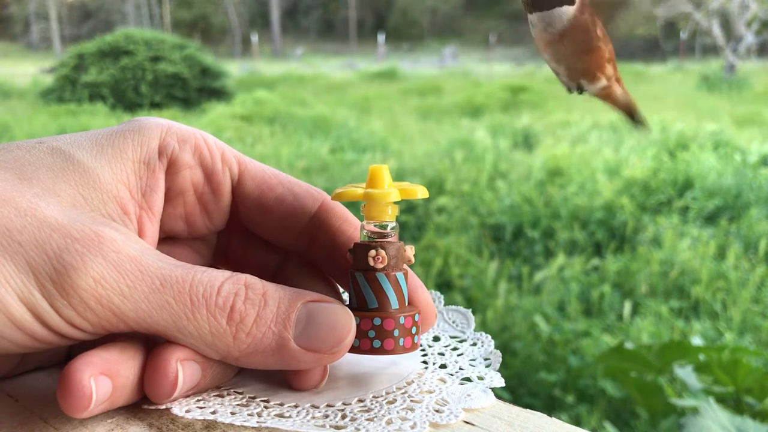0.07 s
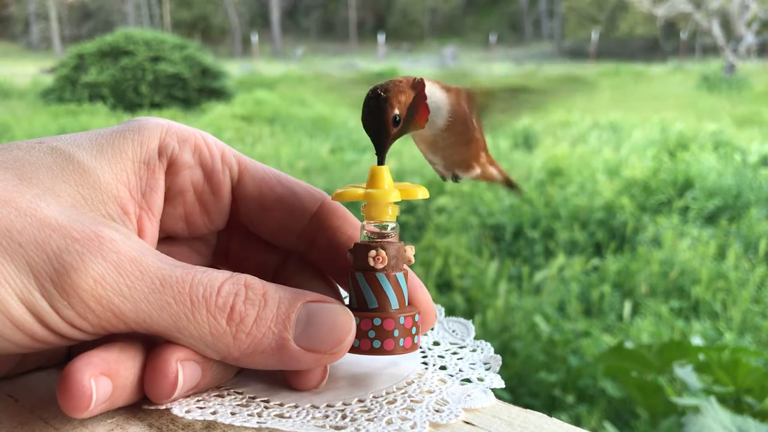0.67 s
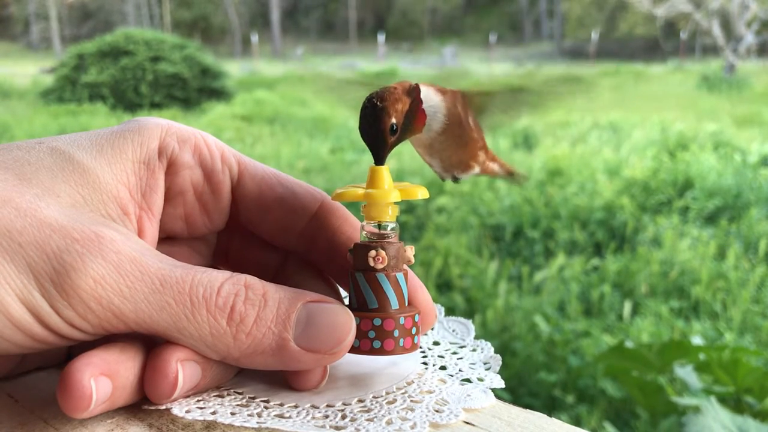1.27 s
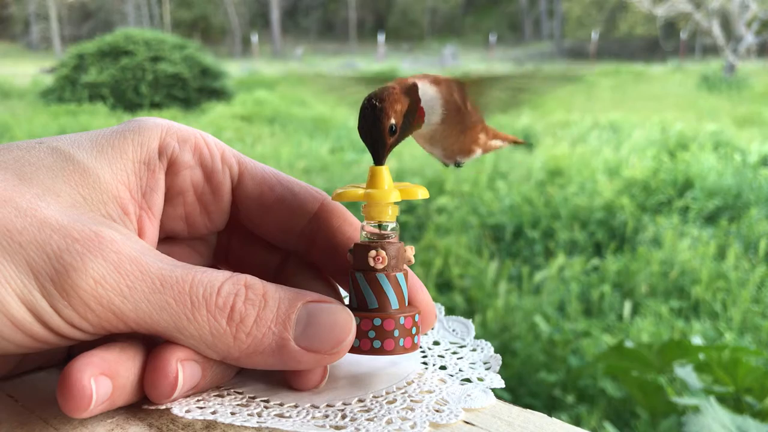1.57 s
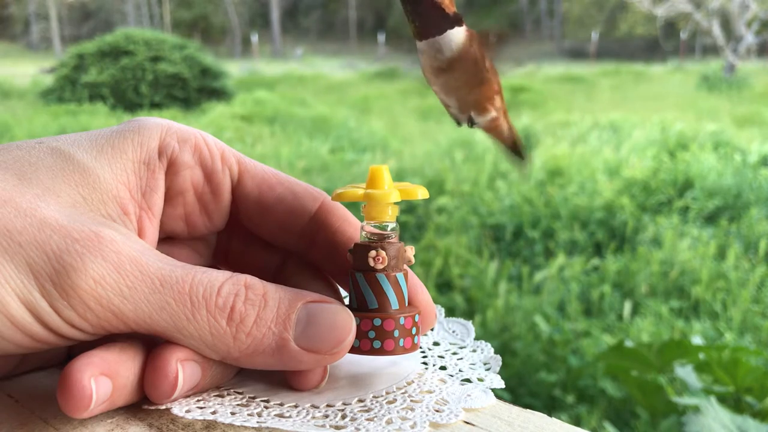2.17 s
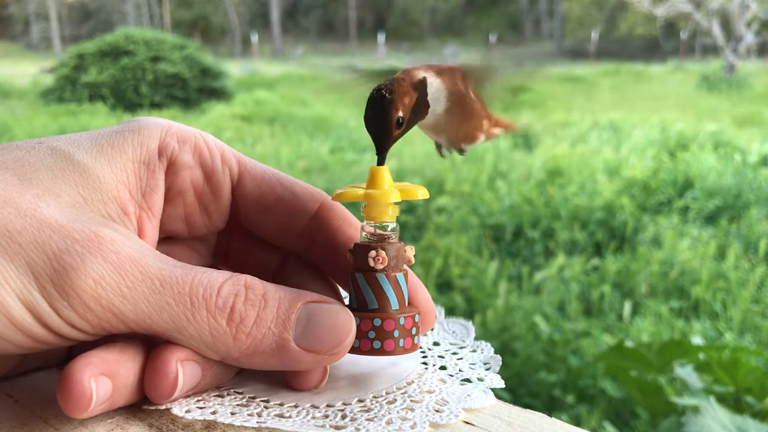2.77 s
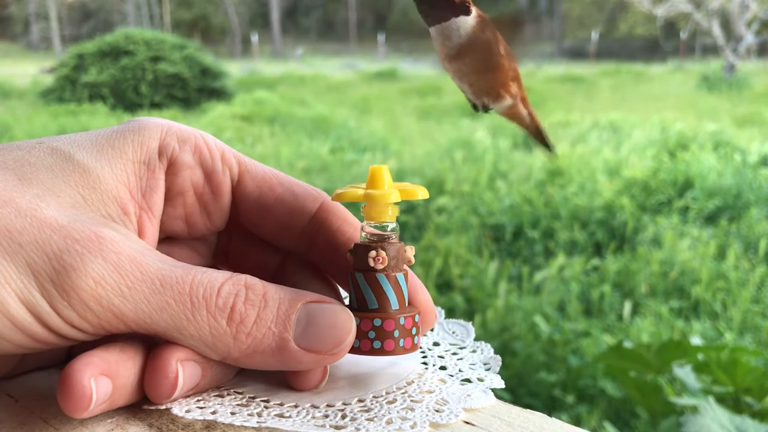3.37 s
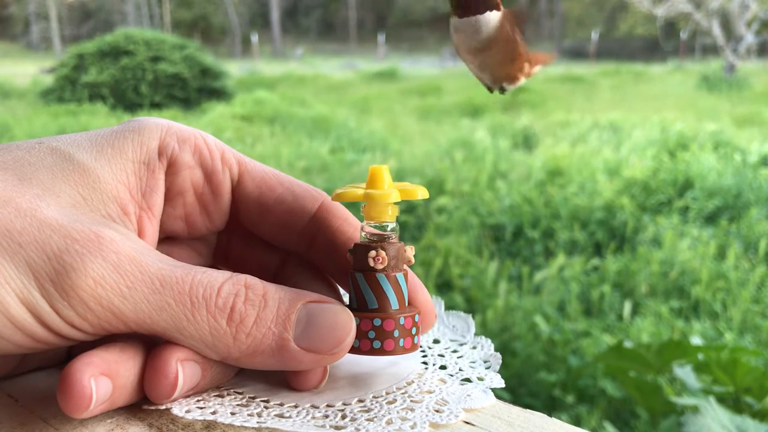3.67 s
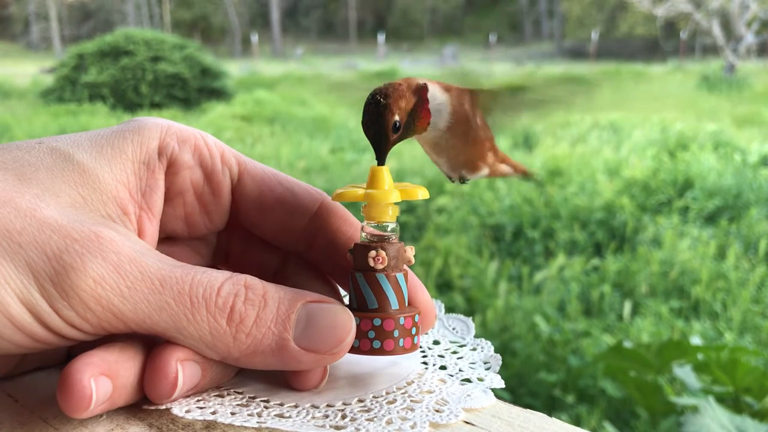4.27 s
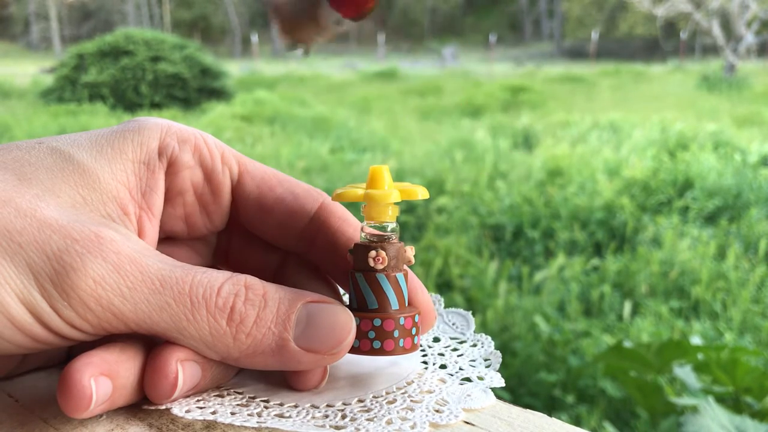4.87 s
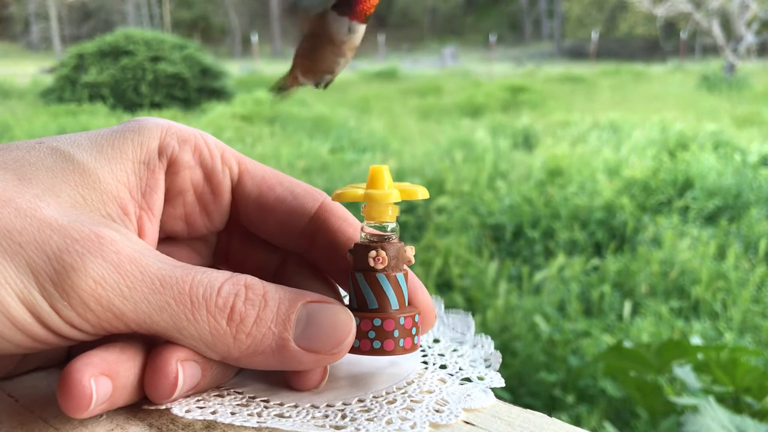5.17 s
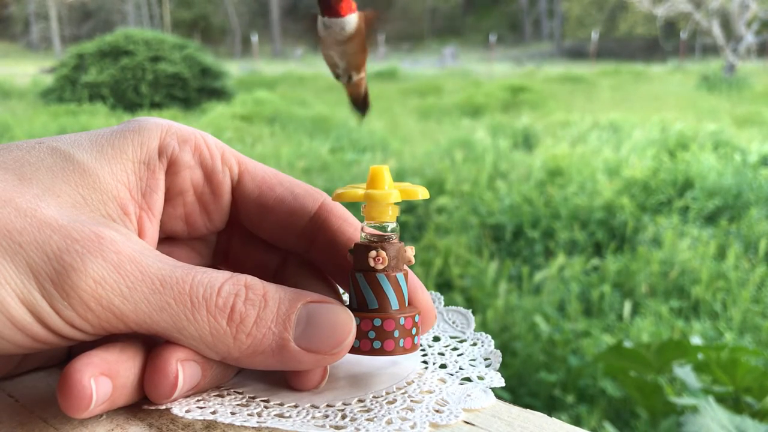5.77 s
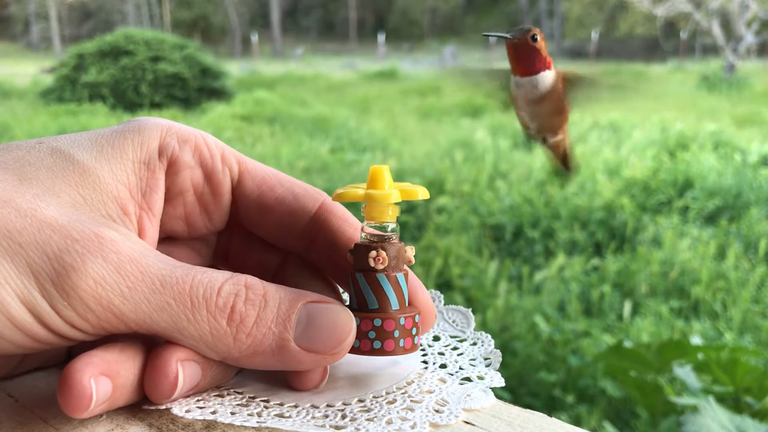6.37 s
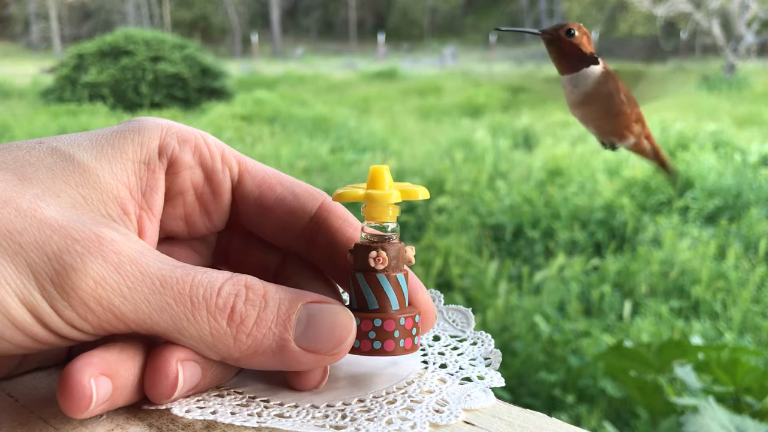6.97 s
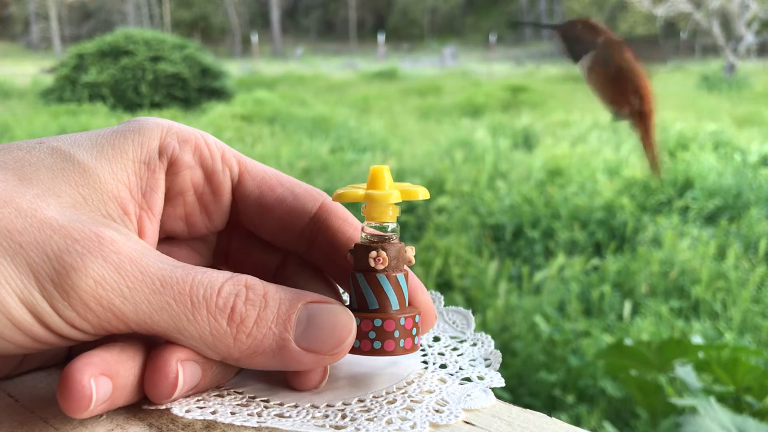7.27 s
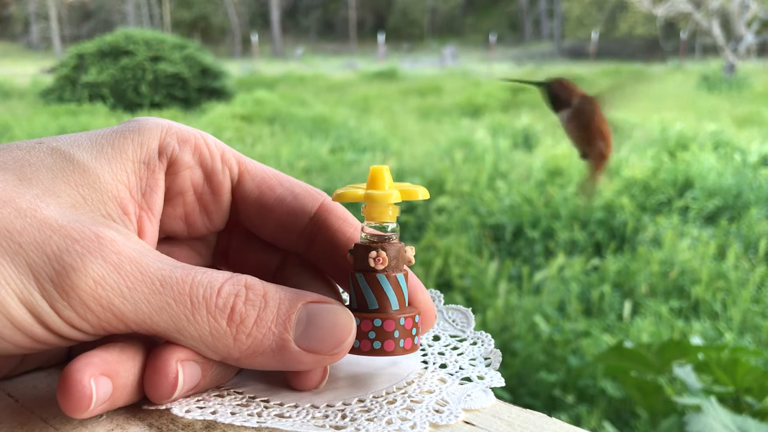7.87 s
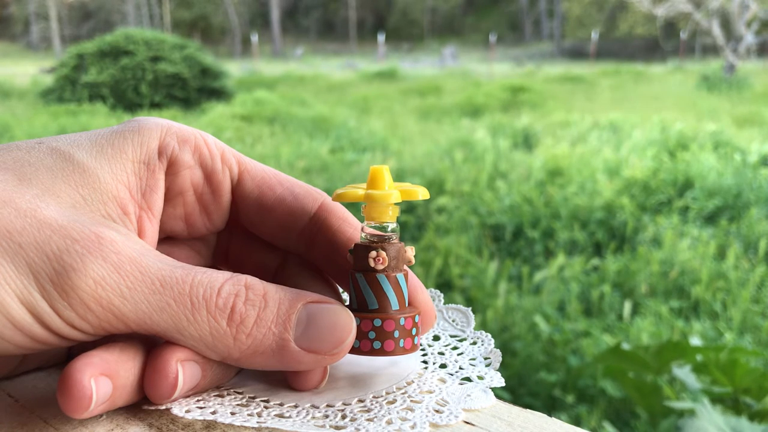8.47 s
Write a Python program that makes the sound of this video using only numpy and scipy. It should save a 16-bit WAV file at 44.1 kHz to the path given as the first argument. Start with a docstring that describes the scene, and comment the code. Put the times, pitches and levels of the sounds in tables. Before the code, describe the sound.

A hummingbird hovers close to the microphone at a garden feeder, its wings making a low, fluttering hum topped by a shrill, pulsing trill. Quick, high chittering opens the scene. The whirr surges as the bird darts about, puffing air onto the microphone, while a second bird trills past. Late on come a sharp chip, more chitter and a brief buzzy call as the wings fade over faint outdoor noise.

```python
"""Hummingbirds at a feeder

A male hovers at a hand-held feeder close to the microphone, darts back and forth and flies off.
Each wingbeat gives a low push of air, a swish through the feathers and a shrill whistle of the
fluttering wing tips. A rival circles with his own wing trill. The birds chip, chitter and buzz in
frequency-modulated tones of the syrinx, and a porch and a house wall reflect the sound."""
import sys
import numpy as np
from scipy import signal
from scipy.fft import rfft, irfft, next_fast_len
from scipy.io import wavfile
from scipy.ndimage import map_coordinates

SR = 44100
rng = np.random.default_rng(int(sys.argv[2]) if len(sys.argv) > 2 else 0)


def int16_out(signal):
    """Quantize to a 16-bit WAV file."""
    q = np.round(np.clip(np.atleast_2d(signal).T, -1, 1) * 32767)
    wavfile.write(sys.argv[1], SR, q.astype(np.int16))


N = 384993
T = np.arange(N) / SR


def amp(db):
    """Amplitude ratio of a level in decibels."""
    return 10 ** (np.asarray(db) / 20)


def unit(x):
    """Normalisation to rms 1."""
    return x / np.sqrt(np.mean(x ** 2) + 1e-20)


def curves(rows, at=T):
    """Linear interpolation of each later column against the first."""
    knots, *columns = np.transpose(rows)
    return [np.interp(at, knots, column) for column in columns]


def wobble(rate):
    """Smooth random modulation, with rate knots a second."""
    return map_coordinates(rng.standard_normal(int(N * rate / SR) + 4), [T * rate])


def coloured(x, spectrum):
    """Zero-phase filtering through points of (f/Hz, gain/dB)."""
    size = next_fast_len(N + SR // 2)
    hz, db = np.transpose(spectrum)
    gain = amp(np.interp(np.log(np.fft.rfftfreq(size, 1 / SR) + 1), np.log(hz), db))
    return irfft(rfft(x, size) * gain, size)[:N]


def noise(spectrum):
    """Filtered Gaussian noise of rms 1."""
    return unit(coloured(rng.standard_normal(N), spectrum))


def add(track, start, sound):
    """Superposition of a sound on the track, from start seconds on."""
    at = round(start * SR) + np.arange(len(sound))
    inside = (at >= 0) & (at < N)
    track[at[inside]] += sound[inside]


def bell(centre, half):
    """Gaussian window whose half-width is its standard deviation."""
    return np.exp(-.5 * ((T - centre) / half) ** 2)


def swells(rows):
    """Amplitude envelope summed from Gaussian windows."""
    return sum(amp(db) * bell(s, half) for s, db, half in rows)


def beats(turns):
    """Times at which the wing phase completes a cycle."""
    return np.interp(np.arange(1, turns[-1]), turns, T)


# Background spectrum: f/Hz, level/dB
GARDEN_SPECTRUM = [(25, -12), (80, -0.5), (115, -4.5), (190, -3.5), (280, -8), (450, -16.5), (750, -31),
                   (1300, -28), (1900, -35), (2500, -36), (3500, -38.5), (4200, -41.5), (6000, -42.5),
                   (16000, -45)]

def garden():
    """Ambient noise, slowly amplitude-modulated by the breeze."""
    breeze_db = .7 * wobble(3)
    return amp(-48.5 + breeze_db) * noise(GARDEN_SPECTRUM)


# Wingbeat rate in steady flight: t/s, f/Hz
BEAT_RATE = [(0.0, 57.03), (0.4, 57.22), (1.0, 57.67), (1.4, 59.4), (2.0, 59.36), (2.4, 57.83),
             (2.9, 61.33), (3.5, 57.45), (4.0, 57.28), (4.55, 59.01), (5.15, 59.7), (5.8, 57.49),
             (6.55, 58.69), (7.35, 58.11), (7.75, 66.06), (8.05, 57.99), (8.4, 60.42), (8.73, 57.67)]
# Bursts of faster, harder strokes: t/s, half-width/s, extra rate/Hz, push gain/dB, whistle gain/dB
DART_BURSTS = [(0.047, 0.018, 0.0, 4, 3.5), (0.592, 0.039, 5.5, 7, 6), (0.746, 0.03, 3.5, 7, 8),
               (0.827, 0.014, 0.69, 6.5, -3), (1.755, 0.031, 5, 7, 13.5), (1.869, 0.0096, 5.0, 0.5, 9.5),
               (2.459, 0.011, 0.75, 3.5, 5), (2.572, 0.023, 2.5, 5.5, 3.0), (2.644, 0.029, 11.0, 3.5, 13),
               (3.035, 0.065, 0.45, 3.5, -1), (3.179, 0.026, 1.7, 8, 12.5), (3.288, 0.018, 0.0, 8.0, 3),
               (3.711, 0.016, 4, 6.5, 12.5), (4.097, 0.012, 2.0, 3.5, 8.8), (4.233, 0.035, 5.5, 7, 9),
               (4.782, 0.046, 6, 7, 12.5), (4.88, 0.016, 5.0, 3.5, 2.5), (5.088, 0.034, 0.22, 3.5, 1),
               (5.663, 0.025, 1.5, 9.5, 12.5), (6.285, 0.041, 2, 9, 17.5), (6.734, 0.026, 3, 4, 8.5),
               (7.322, 0.022, 0.0, 13.5, 19), (7.536, 0.033, 0.0, 6, 7), (8.045, 0.055, 2, 0, 14.5)]
# The wings ease off: t/s, half-width/s, push gain/dB
WING_LULLS = [(0.087, 0.028, -6), (0.668, 0.014, -1), (0.874, 0.028, -6), (1.821, .018, -9),
              (2.535, 0.0096, -12), (2.753, 0.023, -7.5), (3.277, 0.033, -11), (3.773, 0.0068, -5),
              (4.977, 0.016, -16), (7.25, 0.032, -2.5), (7.407, 0.03, -4), (7.88, 0.021, -3.5)]

def flight():
    """Phase is the integral of beat rate. Returns wing phase/cycles, push gain/dB, whistle gain/dB."""
    pace, = curves(BEAT_RATE)
    faster, push_db, whistle_db = sum(np.outer(gains, bell(s, half)) for s, half, *gains in DART_BURSTS)
    lull_db = sum(db * bell(s, half) for s, half, db in WING_LULLS)
    turns = .29 + np.cumsum(pace + faster) / SR
    return turns, push_db + lull_db, whistle_db + 1.44 * lull_db


# Spectrum of air through the feathers: f/Hz, level/dB
SWISH_SPECTRUM = [(200, -49), (500, 5), (900, 12.5), (1300, 3.5), (1850, -1.5), (2400, 5.5), (3400, 1.5),
                  (4200, 3), (5200, 0), (7000, 1), (9500, 3.5), (12000, -3), (16000, 3)]
# Each band's two peaks, timed from the push:
# lowest f/Hz, highest f/Hz, sharp peak/cycles, its sharpness, broad peak/cycles, its relative height
STROKE_BANDS = [(0, 1700, 0.091, 5.4, -0.24, 0.39), (1693, 5000, -0.337, 13, -0.019, 0.4),
                (5100, 11000, -0.098, 13, 0.033, 0.26), (10980, 16000, -0.47, 16, -0.095, 0.64)]

def feather_swish(turns):
    """Flow noise modulated by the stroke: a bright flick as the wing turns over, then lower rushes."""
    def peak(at, sharpness):
        return np.exp(sharpness * (np.cos(2 * np.pi * (turns - at)) - 1))

    air, hz = rfft(noise(SWISH_SPECTRUM)), np.fft.rfftfreq(N, 1 / SR)
    distinct = np.interp(T, [7.3, 8.1], [1, .4])  # the swishes merge as he leaves
    track = np.zeros(N)
    for low, high, sharp_at, sharpness, broad_at, height in STROKE_BANDS:
        band = irfft(air * ((hz >= low) & (hz < high)), N)
        envelope = unit(.32 + peak(sharp_at, sharpness) + height * peak(broad_at, 2.1))
        track += band * envelope ** distinct
    return track


# Hum of forward flight, at twice the beat rate: t/s, level/dB
FORWARD_LEVEL = [(0, -62), (4.95, -76), (5.3, -56.5), (6.9, -59.5), (7.88, -54), (8.04, -39.5), (8.25, -56),
                 (8.73, -60)]
# Its partials: multiple of the beat rate, relative level/dB
FORWARD_PARTIALS = [(2, 0), (4, -7), (8, -22), (10, -19)]

def forward_hum(turns):
    """Symmetry: in forward flight both half strokes sound alike, giving even harmonics only."""
    level_db, = curves(FORWARD_LEVEL)
    partials = sum(amp(db) * np.sqrt(2) * np.cos(2 * np.pi * k * turns) for k, db in FORWARD_PARTIALS)
    return amp(level_db + wobble(6.3)) * partials


# Steady flight as he nears and turns: t/s, push level/dB, whistle level/dB
FLIGHT_LEVELS = [(0.0, -41, -44), (0.5, -43, -40), (0.95, -41, -55.5), (1.2, -37, -46.5),
                 (1.65, -36.5, -46), (2.1, -41.5, -43.5), (2.5, -41, -48.5), (2.9, -38.5, -41),
                 (3.45, -42.5, -44.5), (4.0, -41.5, -43.5), (4.6, -37, -44.5), (5.2, -43.5, -47),
                 (5.9, -47, -47.1), (6.5, -45, -46.5), (7.2, -46, -44.5), (7.7, -50.5, -51.5),
                 (8.25, -49.5, -46), (8.73, -54.5, -78)]
# Base levels of the moving air: t/s, hum level/dB, swish level/dB
AIR_LEVELS = [(0, -45.5, -55), (.3, -43, -57.5), (1.7, -42.5, -56.5), (2.2, -45, -55), (2.7, -41, -54.5),
              (3.5, -51, -55), (4.3, -43, -57), (5, -44, -54.5), (6, -45, -56.5), (7.2, -49, -54),
              (7.6, -54, -53), (8.3, -74, -49.5), (8.73, -65, -63)]
# Spectrum of one push of air: f/Hz, level/dB
PUSH_SPECTRUM = [(40, -42), (70, -8), (120, -1.5), (180, 1.5), (240, -0.5), (300, -3), (420, -13),
                 (600, -17.5), (760, -29), (1200, -41), (2500, -56.5)]
HUM_GROWTH, SWISH_GROWTH = .72, .58  # dB for each dB that the push gains

def wing_air(turns, effort_db):
    """Aerodynamic loading: periodic lift hums at the beat rate; each beat adds a push and a swish."""
    push_db = curves(FLIGHT_LEVELS)[0] + effort_db
    hum_db, swish_db = curves(AIR_LEVELS)
    impulses = np.zeros(N)
    for s in beats(turns):
        add(impulses, s, amp(rng.normal(0, 1.8, 1)))
    pulses = unit(coloured(impulses, PUSH_SPECTRUM))
    hardness = np.clip(.055 * effort_db, 0, 1)  # hard strokes are brighter
    crack = hardness * coloured(pulses, [(250, -49), (500, 3.5), (1200, 7)])
    near = np.interp(T, [4.8, 5.1, 7.4, 8], [.9, .65, .59, .39])  # farther off, eddies blur the beats
    eddies = noise([(40, -22), (80, -12), (110, 1.5), (250, -3.5), (400, -10.5), (700, -19.5),
                    (1500, -68)])
    push = amp(push_db) * (near * (pulses + crack) * amp(-.37) + (1.15 - near) * amp(1) * eddies)
    hum_gain = amp(hum_db + HUM_GROWTH * effort_db + .8 * wobble(11))
    hum = hum_gain * np.sqrt(2) * np.cos(2 * np.pi * (turns + .28))
    swish_gain = amp(swish_db + 2 + SWISH_GROWTH * (push_db + 38.5))
    return push + hum + forward_hum(turns) + swish_gain * feather_swish(turns)


def tip_whistles(times, db, hz, half, glide_hz, scatter_db, scatter_hz, rough):
    """Aeroelastic flutter: each wing tip sounds a brief gliding tone, the two never quite alike."""
    track, t = np.zeros(N), np.arange(-SR // 100, SR // 100) / SR
    smoothing = np.hanning(SR // 800)[None]
    for wing_db in (0, -8):
        size, tune, lag, length = rng.standard_normal((len(times), 4)).T[:, :, None]
        u = t / (np.reshape(half, (-1, 1)) * np.exp(.28 * length)) - .59 * lag  # time in half-widths
        waver = unit(signal.fftconvolve(rng.standard_normal(u.shape), smoothing, "same", axes=1))
        pitch = hz[:, None] * (1 + rough * waver) + scatter_hz * tune + glide_hz * np.tanh(u / 2)
        phase = 2 * np.pi * np.cumsum(pitch, 1) / SR
        envelope = amp(db[:, None] + wing_db + scatter_db * np.tanh(size)) * np.exp(-u ** 2)
        for s, burst in zip(times, envelope * np.sin(phase)):
            add(track, s + t[0], burst)
    return track


# The whistle lengthens as he flies off: t/s, half-width/s
WHISTLE_WIDTH = [(0, 0.00077), (7.35, 0.00076), (8, 0.0014), (8.7, 0.0021)]
WHISTLE_HZ, WHISTLE_HZ_PER_DB = 9298, 28.5  # pitch in steady flight, and its rise with effort
FLICKER_DB = 6  # the flutter catches better on some beats than on others

def wing_trill(turns, effort_db):
    """Flutter twice a cycle, sharp and then softer; harder strokes whistle higher and more surely."""
    times = beats(turns)
    effort_db = np.interp(times, T, effort_db)
    half, = curves(WHISTLE_WIDTH, times)
    unsteadiness = np.exp(-np.maximum(effort_db, 0) / 7)
    drive_db = effort_db + FLICKER_DB * np.tanh(rng.standard_normal(len(times))) * unsteadiness
    duty_db = 10 * np.log10(half * 60)  # a longer whistle spreads the same energy
    db = curves(FLIGHT_LEVELS, times)[1] + drive_db - duty_db
    hz = WHISTLE_HZ + WHISTLE_HZ_PER_DB * drive_db
    down = tip_whistles(times - .0027, db - .3, hz, half,
                        glide_hz=-550, scatter_db=3, scatter_hz=174.6, rough=.0287)
    back = tip_whistles(times + .0034, .5 * db - 35.5, hz - 400, half=.0041,
                        glide_hz=196, scatter_db=2.5, scatter_hz=207.3, rough=.044)
    hiss = noise([(1500, -18), (4000, -30), (7000, -2.5), (11000, 2), (16000, -11)])
    rasp = amp(-23) * np.abs(signal.hilbert(down)) * hiss
    return down + back + rasp


# The rival flies past: t/s, level/dB, half-width/s, f/Hz
RIVAL_PASSES = [(.12, -50, 0.27, 9200), (.44, -30.5, 0.016, 9100), (2.92, -38, 0.058, 9050),
                (4.4, -46.5, 0.081, 9000), (5.7, -42, 0.082, 9100), (6.55, -46, .18, 9050),
                (7.55, -42, 0.1, 9300), (7.8, -46, 0.16, 8800), (8.27, -52, 0.076, 8700),
                (8.51, -44.5, 0.034, 8550), (8.68, -62.5, .04, 8350)]

def rival_trill():
    """Wing-tip flutter at an independent beat rate, swelling and fading with each pass."""
    beat_hz = 63 + 1.5 * wobble(3.5)
    times = beats(np.cumsum(beat_hz) / SR)
    envelope = swells([row[:3] for row in RIVAL_PASSES])
    db = 20 * np.log10(np.interp(times, T, envelope) + 1e-6)
    hz = curves(RIVAL_PASSES, times)[-1]
    return tip_whistles(times, db + 3.5, hz, half=.0014,
                        glide_hz=402, scatter_db=12.5, scatter_hz=123, rough=.019)


def syrinx(hz, db, overtone_db, lowest_hz=1000):
    """Source and filter: six harmonics, overtone_db apart in level, band-passed by the beak."""
    k = np.arange(1, 7)[:, None]
    beak = np.clip((15500 - k * hz) / 2000, 0, 1) * np.minimum(k * hz / lowest_hz, 1) ** 4
    phase = 2 * np.pi * np.cumsum(hz) / SR
    return np.sqrt(2) * amp(db) * np.sum(amp(overtone_db * (k - 1)) * beak * np.sin(k * phase), 0)


# Scolding notes: t/s, level/dB, kind (1 a clear dipping whistle, 0 a rasp)
CHITTER_NOTES = [(0.039, -37, 0), (0.104, -39, 1), (0.132, -34, 0), (0.211, -32, 0), (0.271, -34, 1),
                 (0.3, -34.5, 0), (0.379, -30.5, 0), (.4375, -27.5, 1), (.464, -45, 0), (0.53, -30.5, 0),
                 (0.592, -31.5, 1), (0.619, -38, 0), (0.685, -35, 1), (.713, -32.5, 0), (0.784, -25, 1),
                 (0.8831, -26, 1), (0.9982, -24.5, 1), (1.1065, -26, 1), (1.222, -26, 1), (7.135, -38.5, 0),
                 (7.212, -40, 0), (7.306, -40, 0), (7.405, -40, 0), (7.491, -40, 0), (7.581, -37, 0),
                 (7.647, -47, 0), (7.68, -39, 0), (7.741, -41, 0), (7.774, -37.5, 0), (7.859, -35, 0),
                 (7.936, -32.5, 0)]
# Contours of the two kinds: t/s from the note's centre, nominal f/Hz, relative level/dB
DIP_CONTOUR = [(-.014, 8350, -20), (-.006, 9900, -29), (-.004, 9400, -13), (-.002, 6800, -14),
               (0, 5850, -3), (.002, 6440, -11), (.004, 7400, -10), (.006, 5670, -10), (.009, 4370, -31),
               (.012, 4050, -30)]
RASP_CONTOUR = [(-.014, 8800, -17), (-.004, 8050, -9.5), (-.001, 7100, -6.5), (.002, 6170, -10),
                (.005, 5260, -21), (.008, 4700, -24)]

def chitter():
    """Frequency modulation: shallow flutter leaves a whistle clear, deep flutter makes a rasp."""
    track = np.zeros(N)
    loudest_db = max(level for _, level, _ in CHITTER_NOTES)
    for s, level, clear in CHITTER_NOTES:
        contour, depth_hz, overtone_db = (DIP_CONTOUR, 160, -11) if clear else (RASP_CONTOUR, 1100, -8.5)
        t = np.arange(contour[0][0], contour[-1][0], 1 / SR)
        hz, db = curves(contour, t)
        rise = clear * .016 * min(loudest_db - level, 10)  # softer whistles sit higher
        hz = hz * (rng.normal(.96, .0175) + rise)
        flutter = np.sin(2 * np.pi * (rng.normal(410, 64.5) * t + rng.random()))
        add(track, s + t[0], syrinx(hz + depth_hz * flutter, db + level + 1, overtone_db))
    return track


# Falling chips: t/s, level/dB, length/s, lower cutoff of the beak/Hz
CHIP_NOTES = [(.063, -48, .024, 3000), (3.409, -50, .02, 4500), (3.858, -50, .025, 4200),
              (4.05, -49, .02, 4500), (4.095, -52, .016, 2200), (4.509, -46, .018, 4500),
              (4.988, -56, .022, 4500), (5.568, -48, .025, 3600), (5.62, -48, .02, 4800),
              (6.1952, -26, .0135, 2300), (6.554, -46, .018, 4800), (7.586, -47, .019, 2800),
              (7.778, -48, .021, 3200), (8.0412, -32, .0145, 3700)]
# Contour of a chip: share of its length, f/Hz, relative level/dB, step between harmonics/dB
CHIP_CONTOUR = [(-.06, 9300, -30, -35), (.04, 8700, 0, -32), (.22, 6400, 0, -17), (.36, 3700, -2, -7),
                (.48, 2650, -4, -5.5), (.68, 2250, -5, -5.5), (.88, 2050, -6, -6), (1.1, 1300, -26, -7)]

def chips(loud):
    """Frequency sweeps, the loud or the soft ones: each plunges over two octaves and turns harsh."""
    track = np.zeros(N)
    for s, level, length, lowest_hz in CHIP_NOTES:
        if (level > -35) == loud:
            progress = np.arange(CHIP_CONTOUR[0][0], CHIP_CONTOUR[-1][0], 1 / (length * SR))
            hz, db, overtone_db = curves(CHIP_CONTOUR, progress)
            dull_db = .3 * min(level + 30, 0)  # weak chips have weaker overtones
            add(track, s + progress[0] * length, syrinx(hz, db + level, overtone_db + dull_db, lowest_hz))
    return track


# Puffs of downwash: t/s, level/dB, half-width/s
DOWNWASH_PUFFS = [(.62, -52, 0.063), (.76, -44, 0.043), (.85, -27, 0.0046), (1.33, -49, 0.035),
                  (1.81, -32.5, 0.029), (1.895, -33, 0.013), (2.47, -37, 0.031), (2.66, -41, 0.12),
                  (3.21, -32, 0.011), (3.3, -26, 0.0073), (4.33, -31, 0.014), (4.57, -45, 0.026),
                  (4.8, -35, 0.016), (4.89, -31, 0.019), (5.12, -47, 0.059), (5.64, -36, 0.018)]
# Their spectrum: f/Hz, level/dB
DOWNWASH_SPECTRUM = [(25, -68), (50, 12), (90, 2.5), (170, 1.5), (300, -11.5), (600, -33.5), (1500, -52.5)]

def downwash():
    """Turbulent pressure: air driven down by the wings strikes the microphone and rumbles."""
    return swells(DOWNWASH_PUFFS) * noise(DOWNWASH_SPECTRUM)


# Soft rustles: t/s, level/dB, half-width/s
RUSTLE_SWELLS = [(2.025, -46, 0.014), (2.066, -44, 0.014), (2.195, -45, 0.013), (2.472, -42.5, 0.009),
                 (2.78, -48.5, 0.037), (5.035, -46, 0.012), (5.1, -50, 0.029), (8.34, -55, 0.016)]
# Their spectrum: f/Hz, level/dB
RUSTLE_SPECTRUM = [(150, 11.5), (350, 5), (1100, 0), (1900, -7.5), (2800, -12), (5000, -17), (15000, -12)]

def rustles():
    """Fast random amplitude modulation gives swells of noise a grainy sound."""
    grain = amp(3 * wobble(400))
    return swells(RUSTLE_SWELLS) * unit(noise(RUSTLE_SPECTRUM) * grain)


def bill_tap():
    """Impact noise: a short, bright burst as the bill meets the feeder."""
    click = noise([(800, -5), (2500, -19), (6000, 8), (9000, 9), (16000, -19)])
    return amp(-42) * bell(2.472, half=.0084) * click


# The threat call: t/s, top f/Hz, level/dB, depth of the pitch dips/Hz
BUZZ_CONTOUR = [(8.156, 7000, -43, 3200), (8.17, 7200, -36.5, 3300), (8.198, 7200, -32, 3000),
                (8.206, 7150, -32, 2300), (8.255, 7050, -31.5, 2000), (8.263, 6950, -39, 1200),
                (8.268, 6850, -55, 900)]

def buzz():
    """Joint frequency and amplitude modulation: rapid upward flicks, each ending on a shrill note."""
    top_hz, db, depth_hz = curves(BUZZ_CONTOUR)
    flick_hz = 241 + 5 * wobble(120)
    cycle = 2 * np.pi * np.cumsum(flick_hz) / SR
    pitch = top_hz - depth_hz * ((1 - np.sin(cycle)) / 2) ** 2 + 260 * wobble(3000)
    level = db + 6.5 * np.cos(cycle - 1.2) + 1.5 * wobble(300)
    start, end = BUZZ_CONTOUR[0][0], BUZZ_CONTOUR[-1][0]
    on = (T > start) & (T < end)
    track = np.zeros(N)
    add(track, start, syrinx(pitch[on], level[on] - 5, overtone_db=-4))
    return track


def porch(x, wet_db, wall_db, t60):
    """Scattering and reflection: the porch adds a decaying tail, the house wall an echo after 32 ms."""
    t = np.arange(SR // 3) / SR
    tail = rng.standard_normal(len(t)) * amp(-60 * t / t60) * (t > .002)
    wall = rng.standard_normal(len(t)) * np.exp(-((t - .032) / .0015) ** 2)
    response = amp(wet_db) * tail / np.linalg.norm(tail) + amp(wall_db) * wall / np.linalg.norm(wall)
    reflected = signal.fftconvolve(x, response)[:N]
    return x + coloured(reflected, [(2000, 2), (5500, -1), (9000, 1.5), (15000, 3)])


def scene():
    """Superposition of birds and garden: the farther a source, the greater its reflected share."""
    turns, push_db, whistle_db = flight()
    close = porch(wing_trill(turns, whistle_db) + chips(loud=True), wet_db=-23, wall_db=-33, t60=.12)
    passing = porch(buzz(), wet_db=-12, wall_db=-25, t60=.14)
    farther = porch(chitter() + chips(loud=False) + rival_trill(), wet_db=-5, wall_db=-18, t60=.18)
    direct = downwash() + rustles() + bill_tap() + garden() + wing_air(turns, push_db)
    return (close + passing + farther + direct)[None]


def record(dry):
    """Band limiting: the microphone attenuates the deepest bass and passes nothing above 16 kHz."""
    heard = coloured(dry[0], [(20, -24), (32, -14), (42, -7), (52, 0)])
    passband = np.fft.rfftfreq(N, 1 / SR) < 16000
    return irfft(rfft(heard) * passband, N)[None]


dry = scene()
out = record(dry)
int16_out(out)
```